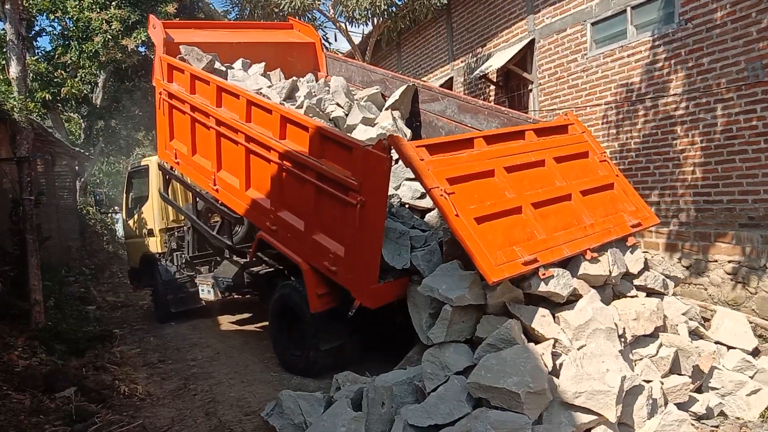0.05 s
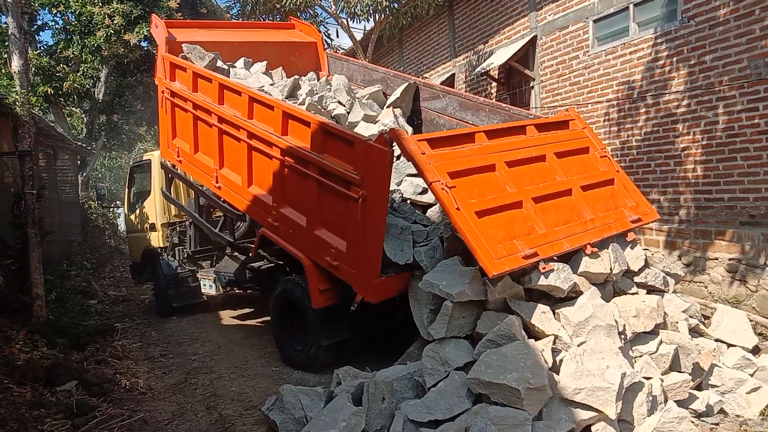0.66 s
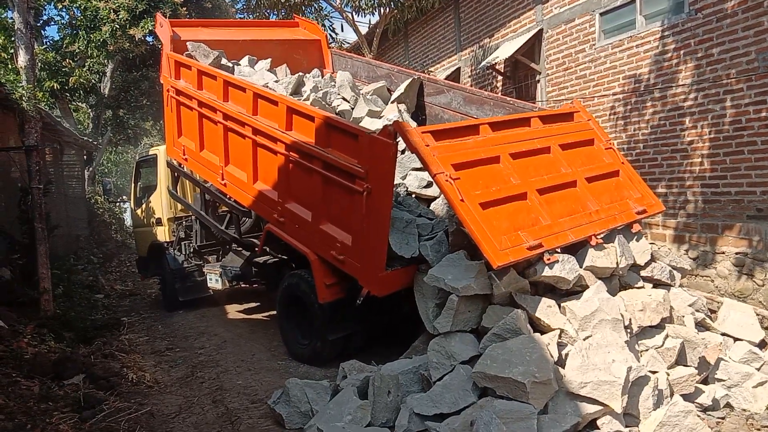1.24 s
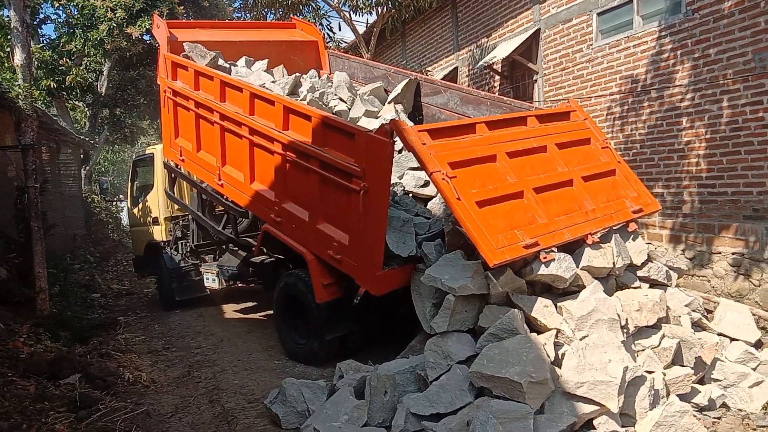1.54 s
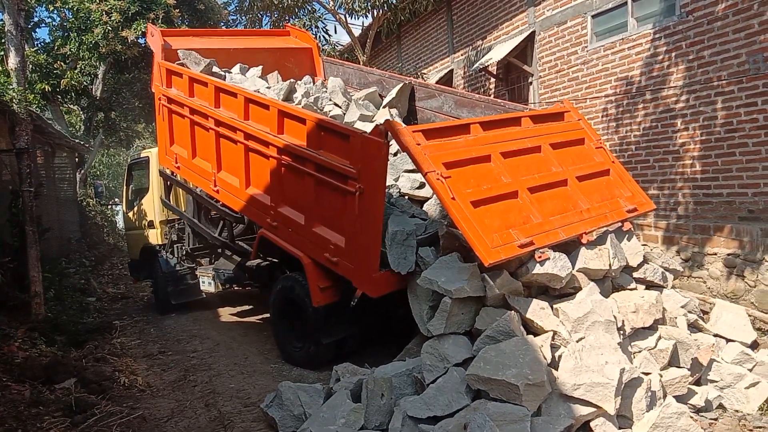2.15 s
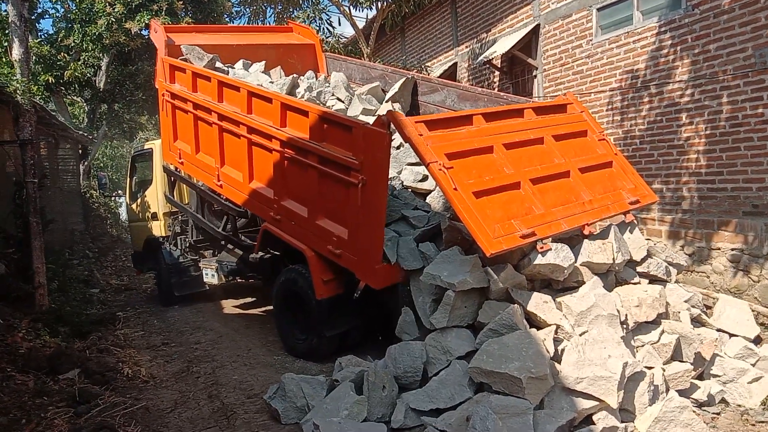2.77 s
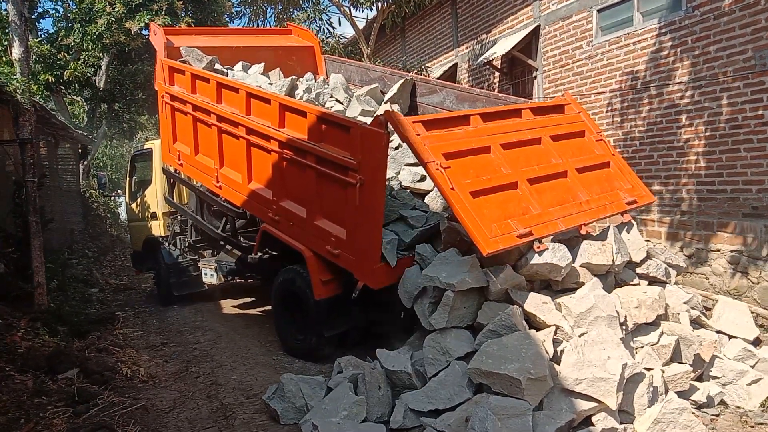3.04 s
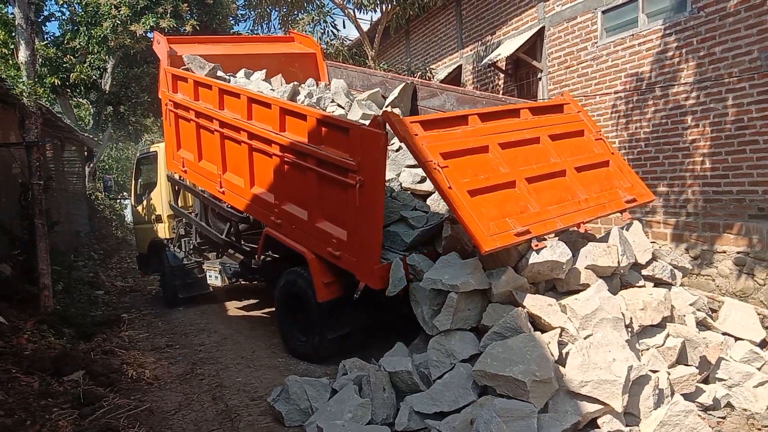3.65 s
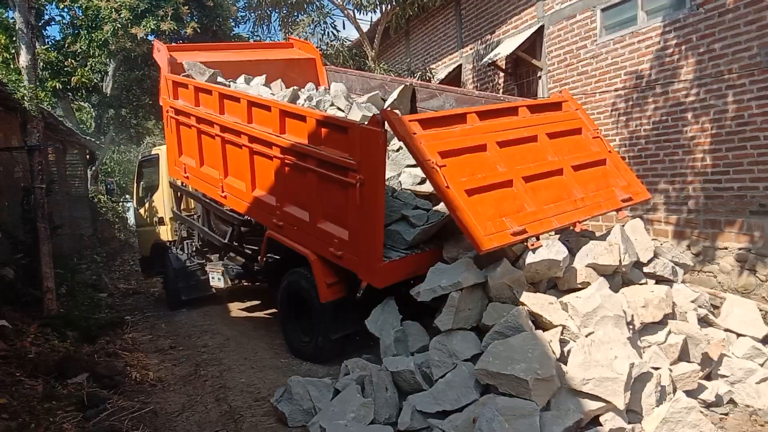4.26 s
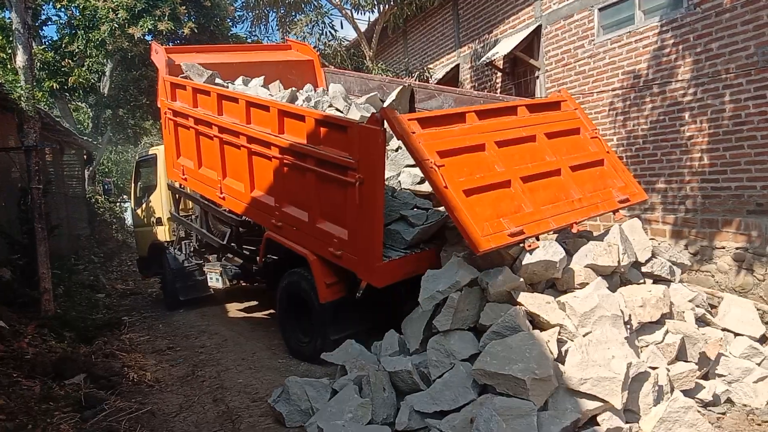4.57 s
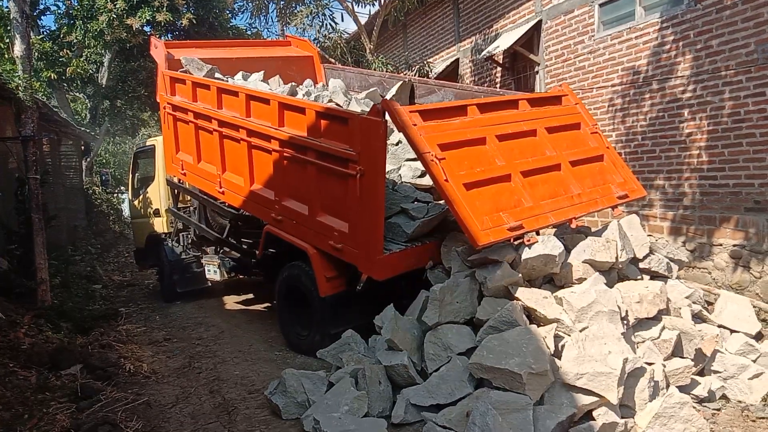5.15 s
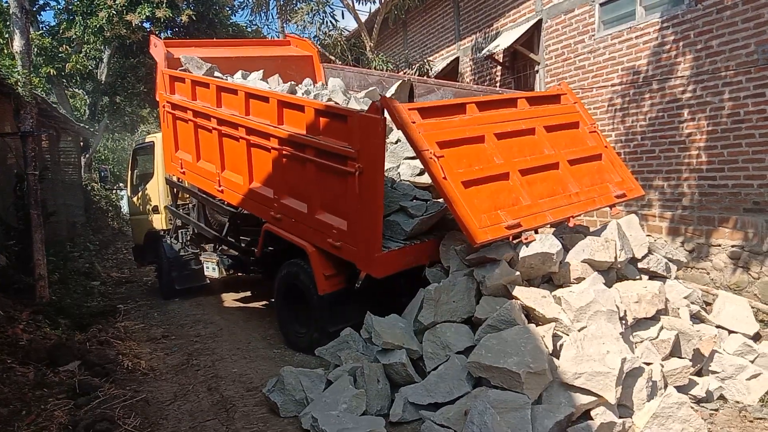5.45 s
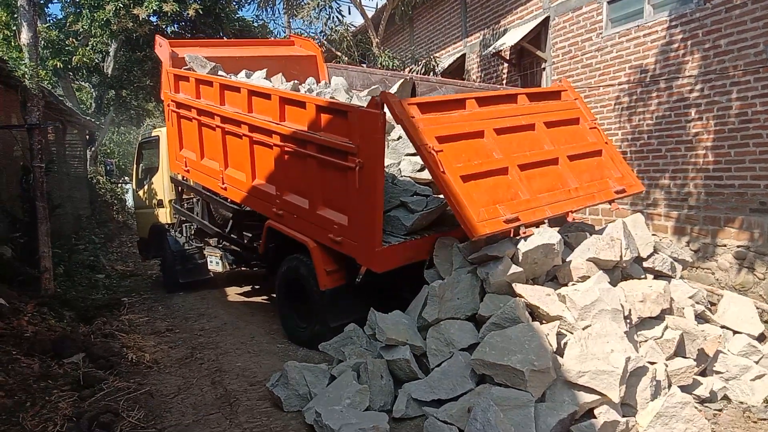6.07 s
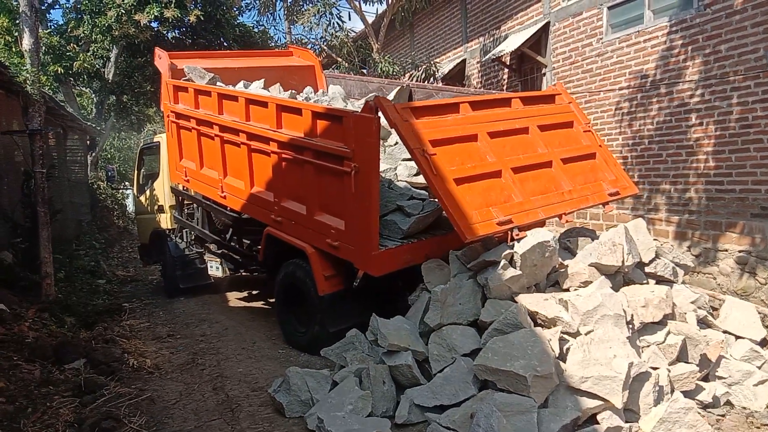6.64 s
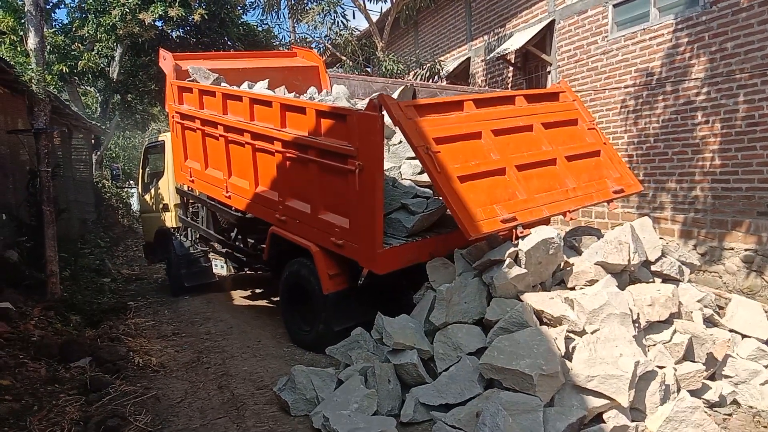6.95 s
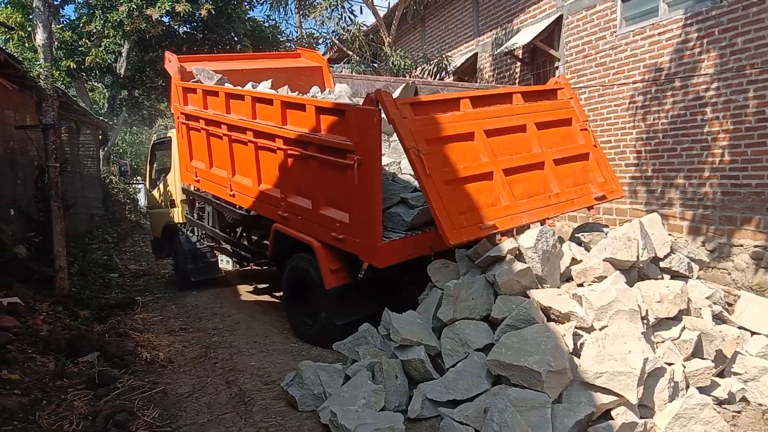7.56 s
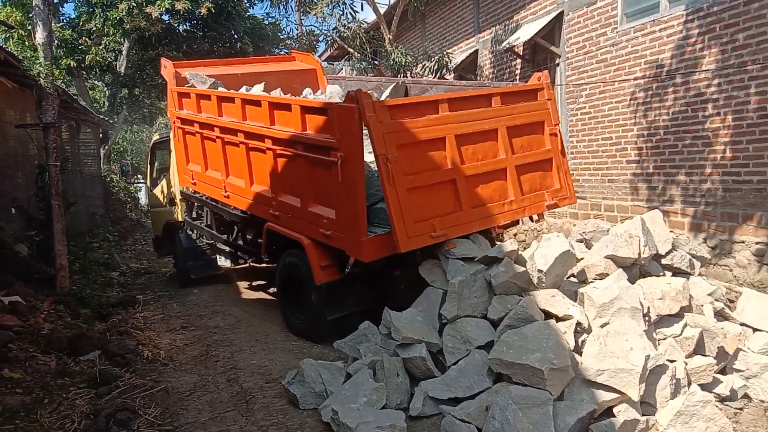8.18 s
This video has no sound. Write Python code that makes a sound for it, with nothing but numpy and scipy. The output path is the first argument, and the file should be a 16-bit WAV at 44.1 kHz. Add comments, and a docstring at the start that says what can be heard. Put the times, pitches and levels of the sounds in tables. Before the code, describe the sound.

A tipper truck's diesel engine idles steadily throughout with a light rattle, heard on a phone microphone in a yard with a short echo. In the first second a few rocks shift and knock onto a pile. After a lull, the load starts slipping at about 2 seconds, grinding over the steel bed with thuds, gritty cracks and bright stone clinks. A heavier tumble runs from about 3.7 to 5 seconds, with hard knocks and ringing chips. The emptying bed booms hollowly at 5.5 seconds, a hinge squeaks briefly just before 6, and more booms lead into a low metal drone as rocks drag across the floor until about 7. From 7.5 seconds a last loud, dense rush of stones rumbles and crashes down, ringing the bed, and eases slightly just after 8 seconds.

```python
"""Tipper truck unloading quarry rock.

A yard with a house and trees, heard on one phone microphone. The diesel idles beside a brick wall
while rocks slide off its raised steel bed onto a pile. They grind over the steel, thud, knock and
clink; the emptying bed booms and drones, a hinge squeaks, and the load ends in a last rush of stones."""
import sys
import numpy as np
from scipy import signal
from scipy.fft import rfft, irfft
from scipy.io import wavfile
from scipy.ndimage import uniform_filter1d

SR = 44100
rng = np.random.default_rng(int(sys.argv[2]) if len(sys.argv) > 2 else 0)


def persist_wave(psi):
    """Save psi, clipped to +-1, as 16-bit WAV."""
    counts = np.round(np.clip(psi, -1, 1) * 32767).astype(np.int16)
    wavfile.write(sys.argv[1], SR, np.atleast_2d(counts).T)


N = 370881
TIME = np.arange(N) / SR
AGE = TIME[:20000]  # time since a contact, for as long as it rings (s)

# modes of the steel bed and tailgate: f/Hz, level/dB, t60/s
BED_MODES = [(89.8, -6, 0.6), (112.7, -11, 0.9), (175, 5, 0.32), (197.6, -4, 0.39), (219, -18, 0.21),
             (250.1, 6, 0.14), (279.5, -13, 0.84), (318.2, 5.5, 0.15), (379.5, -4.5, 0.24), (415, 6, 0.085),
             (740, -19, 0.19), (990, -20.5, 0.076), (970, -24, 0.19), (1264, -16.5, 0.41),
             (2740, -25.5, 0.29)]
# spectrum of a stone chip's tick: f/Hz, level/dB
TICK_SPECTRUM = [(1500, -25.5), (3500, 3.5), (5200, 5.5), (6400, -14), (8000, -27), (9800, -12.5),
                 (12000, -22.5), (15000, -17.5)]


def blows(thud, knock, crack, thud_db=0, knock_db=-8, crack_db=1, own_ring_db=2, own_q=22):
    """Each rock lands, crumbles at the edges and colours the blow with resonances of its own."""
    # the hardest landings, in relative levels: t/s, knock/dB, thud/dB, crack/dB, echo/dB
    landings = [(0.116, -25.5, -36.5, -51, 0), (0.263, -48, -44.5, -69, 3), (0.508, -34.5, -44.5, -58, 1),
                (0.654, -23, -33.5, -51.5, 5), (0.69, -29.5, -33, -61, 0.5), (0.736, -34.5, -41, -63, -11),
                (1.818, -35, -38, -59, 2), (1.941, -35, -33, -50.5, -1), (2.326, -29.5, -30, -51.5, 6),
                (2.409, -34, -34, -52, -5), (2.525, -26, -28, -70, -6), (2.596, -29, -29.5, -50, -2),
                (2.668, -37, -32, -43, 18), (2.841, -31.5, -34, -43.5, -5), (2.934, -33, -50, -40, -16),
                (3.072, -41, -40, -46.5, -8), (3.236, -26.5, -30.5, -52, -3), (3.332, -32, -32.5, -69, 4),
                (3.456, -27, -46.5, -48.5, 7), (3.672, -13, -41, -32.5, 7), (3.684, -15.5, -22, -30, -2.5),
                (3.85, -28, -37, -30.5, -12), (3.903, -21.5, -24, -46, -13),
                (4.023, -22.5, -24.5, -41, -9.5), (4.082, -26.5, -44, -34.5, -9),
                (4.135, -14.5, -20.5, -29.5, 0), (4.26, -33, -34, -41.5, -20),
                (4.322, -21, -19.5, -36.5, 10), (4.399, -18, -17, -40, -10), (4.428, -21, -34, -41, -6),
                (4.498, -18.5, -29, -37.5, 0), (4.585, -33, -28, -53, -10), (4.641, -44, -36, -44.5, 2),
                (4.698, -25.5, -24, -45.5, -8), (4.849, -37, -29.5, -48.5, 17),
                (4.966, -37, -26.5, -53.5, -8), (5.06, -32.5, -32.5, -52, -3), (5.27, -62, -68, -50.5, 1),
                (5.519, -28.5, -22, -42.5, 7), (6.135, -34, -32, -48, -11), (6.204, -14.5, -49, -25.5, 2.5),
                (6.454, -23, -26, -43, -1), (6.548, -27.5, -30, -38, -3.5),
                (6.631, -27.5, -51, -47.5, -7.5), (6.729, -39, -29, -73, -13.5),
                (6.853, -33.5, -33.5, -49.5, -3), (6.918, -32, -35.5, -43, 3),
                (6.958, -28.5, -24, -38.5, -8.5), (7.119, -23.5, -28.5, -47.5, 0.5),
                (7.276, -26.5, -41.5, -73, -13), (7.459, -24, -29.5, -47, 5.5), (7.524, -22, -22, -34, -4),
                (7.534, -16, -17.5, -34.5, -6.5), (7.556, -24.5, -25.5, -46.5, -2),
                (7.604, -28.5, -25, -51, -17), (7.654, -27.5, -22, -37, -9),
                (7.697, -14.5, -22.5, -30.5, -7), (7.723, -25, -20.5, -34, -3),
                (7.754, -21, -17, -36, -3.5), (7.838, -21.5, -27, -33.5, 2), (7.89, -20, -19, -32, -2),
                (7.983, -23, -18.5, -35, -3.5), (8.135, -28, -27.5, -48.5, 6), (8.277, -55, -46, -46, -6)]
    out = np.zeros(N)
    for s, knock_level, thud_level, crack_level, echo_db in landings:
        hit = through(crumble(rate=1800, crush_s=0.0084, chatter_db=-4.5), yard(echo_db))
        pitches = np.geomspace(750, 5400, num=11) * 2 ** rng.uniform(-.13, .13, size=11)
        hit = hit + undb(own_ring_db) * sum(stone(hit, hz, own_q) for hz in pitches)
        levels = thud_level + thud_db, knock_level + knock_db, crack_level + crack_db
        for body, db in zip((thud, knock, crack), levels):
            add(out, s, undb(db) * strike(through(hit, body)))
    return out


def slipping(rise_s=0.075, settle_t60=0.75, sag_db_per_s=5.5):
    """Rumble, grind and grit envelopes: each slip gathers speed, slows a little, then settles."""
    # the load's fits and starts, in relative levels: t/s, length/s, rumble/dB, grind/dB, grit/dB
    slips = [(-0.05, 0.026, -25, -36.5, -52.5), (0.582, 0.048, -34, -40, -57.5),
             (1.506, 0.57, -42, -54, -65), (2.157, 0.25, -40.5, -42.5, -54.5), (2.447, 0.29, -35, -39, -49),
             (2.843, 0.74, -37.5, -45, -53.5), (3.658, 1, -28.5, -36, -43.5), (4.172, 0.4, -33, -31, -52),
             (4.708, 0.3, -39, -45, -57), (5.34, 0.41, -26, -43, -79), (5.741, 0.76, -38.5, -47.5, -57),
             (6.182, 0.071, -21.5, -27.5, -62), (6.41, 0.54, -43, -43, -63), (7.13, 0.6, -34.5, -41.5, -61),
             (7.494, 0.31, -24, -37, -41.5), (7.684, 0.23, -23, -26, -39.5), (7.942, 0.17, -25, -33, -41),
             (8.233, 0.23, -28, -38, -58.5)]
    power = 0  # overlapping slips add in power
    for s, length_s, *levels_db in slips:
        motion = swell(s, length_s, rise_s, settle_t60, sag_db_per_s)
        power = power + np.outer(undb(levels_db), motion) ** 2
    return np.sqrt(power)


def slide(thud, knock, crack, rumble, grind, grit, slide_db=-1, rubble_db=-6):
    """Boulders rumble, rocks grind and small stones rasp, over a dense patter of rubble."""
    rubble = patter(rate=280, soften_db=1)
    boulders = scrapes(105.7, 458, q=5, count=400)
    rocks = scrapes(482, 1500, q=7.3, count=500)
    pebbles = scrapes(1620, 5600, q=10, count=420)
    space, out = yard(echo_db=-11), 0
    for scraping, body, drive in (boulders, thud, rumble), (rocks, knock, grind), (pebbles, crack, grit):
        sound = unit(through(scraping, body)) + undb(rubble_db) * unit(through(rubble, body))
        out = out + drive * unit(through(sound, space))
    return undb(slide_db) * out


def scrapes(low_hz, high_hz, q, count, scrape_t60=0.06, spread_db=13):
    """Stones take turns to slip; each short scrape rings at the pitch of its stone."""
    out, t = np.zeros(N), AGE[:len(AGE) // 8]
    for k, (late, pitch, hardness) in enumerate(rng.random((count, 3))):
        rub = rng.standard_normal(len(t)) ** 3 * fade(t, scrape_t60)  # cubed noise is spiky
        hz = low_hz * (high_hz / low_hz) ** pitch
        add(out, (k + late) / count * N / SR, undb(spread_db * hardness) * unit(stone(rub, hz, q)))
    return unit(out)


def patter(rate, soften_db):
    """Rubble makes random contacts, `rate` a second, some a little softer than the rest."""
    force = undb(-soften_db * np.minimum(rng.exponential(size=N), 4))
    return (rng.random(N) < rate / SR) * force * rng.choice([-1, 1], N)


def booms(focus_db_per_octave=16, contact_s=0.0039, lowest_hz=85):
    """Heavy blows ring the bed; each spot favours the modes near its own pitch."""
    # heavy rocks dropping on the steel floor: t/s, level/dB, favoured f/Hz
    drops = [(0.655, -28, 347), (1.82, -37.5, 118), (1.975, -35, 126), (2.548, -27, 417), (2.99, -43, 117),
             (3.331, -27.5, 254), (4.2, -24.5, 260), (4.401, -20, 410), (5.403, -34, 353),
             (5.517, -16.5, 254), (6.056, -18, 230), (6.102, -14.5, 175), (6.568, -30.5, 170),
             (6.961, -36, 335), (7.534, -18, 208), (7.714, -16, 306), (7.731, -30, 96), (7.984, -25.5, 170)]
    out = np.zeros(N)
    radiation = signal.butter(3, lowest_hz, "highpass", fs=SR, output="sos")
    onset = (1 - np.exp(-AGE / contact_s)) ** 2
    for s, db, spot_hz in drops:
        modes = np.array(BED_MODES, float)
        modes[:, 1] -= focus_db_per_octave * np.abs(np.log2(modes[:, 0] / spot_hz))
        plate = signal.sosfilt(radiation, ring(modes) * onset)
        add(out, s, undb(db) * strike(through(plate, yard(echo_db=-15))))
    return out


def clinks(t60=0.013, q=2, twin_ratio=1.06, low_ratio=0.53):
    """A stone chatters and rings briefly in a close pair of modes over a weaker low one; chips fly."""
    # struck stones: t/s, f/Hz, ring/dB, chatter/dB, chips/dB
    struck_stones = [(0.661, 1660, -42, -2, -85), (1.614, 3000, -57, 1, -70), (2.33, 1690, -41, -6, -74),
                     (2.409, 2650, -46, 0, -59), (2.424, 4600, -73, -3, -71), (2.487, 2800, -51, -7, -54),
                     (2.487, 1120, -39.5, -6, -60), (2.594, 2500, -36, 16, -42.5),
                     (2.671, 2750, -42, 9, -45.5), (2.843, 3710, -42, -2, -54.5),
                     (2.936, 5430, -52, 0, -47.5), (3.14, 1230, -28.5, 0, -51),
                     (3.236, 2810, -35.5, -4, -45), (3.507, 3580, -46.5, -11, -56),
                     (3.85, 1145, -14.5, -38, -43.5), (3.856, 1213, -18.5, -14.5, -58),
                     (4.14, 2810, -29, -6, -46), (4.401, 744, -22, -23, -48.5), (4.646, 4800, -58, 2, -59),
                     (4.695, 840, -26, -13, -65), (4.969, 2850, -49, 6, -58.5), (5.001, 863, -30, -15, -56),
                     (5.058, 2600, -47, -1, -55.5), (5.271, 3040, -43.5, -6, -54),
                     (5.271, 5000, -52, -15, -62), (5.517, 3260, -51.5, 2.5, -64.5),
                     (5.66, 9300, -77, -5, -74), (5.767, 9350, -74, -12, -75),
                     (6.204, 3050, -40, -15, -47.5), (6.208, 4860, -41.5, -8, -57),
                     (6.547, 3100, -41, -1, -47), (6.729, 750, -39, -4, -74), (6.967, 2800, -48, 6, -51.5),
                     (7.122, 1096, -37, -4, -52), (7.699, 930, -18.5, -8.5, -52),
                     (7.725, 3220, -34.5, 0, -50), (7.754, 3370, -41, 0, -51),
                     (7.839, 3790, -38.5, -5.5, -43), (7.891, 910, -23, -10, -55),
                     (7.987, 3040, -45, -8, -48.5)]
    out, tick = np.zeros(N), colour(TICK_SPECTRUM)
    for s, hz, db, chatter_db, chips_db in struck_stones:
        tone = ring([(hz, 0, t60), (hz * twin_ratio, -6, t60), (hz * low_ratio, -12, t60)])
        tone = stone(stone(tone, hz, q), hz, q)  # a blunt contact takes a few cycles to build up
        tone = through(tone, crumble(rate=970, crush_s=0.0053, chatter_db=chatter_db))
        add(out, s, undb(db) * strike(through(tone, yard(echo_db=-10, far_db=-34))))
        add(out, s, undb(chips_db) * strike(through(chips(tick), yard(echo_db=-18, far_db=-27.5))))
    return out


def slabs(t60=0.14, mode_scatter=0.03):
    """Each flat slab rings on in a few modes, spaced a little differently from the next slab's."""
    # struck slabs: t/s, f/Hz, level/dB
    struck_slabs = [(2.596, 2970, -48), (2.669, 3020, -45), (2.842, 3810, -48.5), (3.142, 3660, -48.5),
                    (3.237, 3320, -53), (3.507, 3554, -50.5), (4.14, 2820, -35)]
    # modes of a slab: multiple of its pitch, level/dB
    slab_modes = [(0.581, -6), (0.75, -2.5), (1, 1.5), (1.22, -5.5), (1.461, -14)]
    out = np.zeros(N)
    for s, hz, db in struck_slabs:
        skews = 1 + mode_scatter * rng.standard_normal(len(slab_modes))
        modes = [(hz * ratio * (1 if ratio == 1 else skew), mode_db, t60)
                 for (ratio, mode_db), skew in zip(slab_modes, skews)]
        tone = ring(modes) * (1 - fade(AGE, 0.008))
        tone = through(tone, crumble(rate=1200, crush_s=0.012, chatter_db=-3))
        add(out, s, undb(db) * strike(through(tone, yard(echo_db=-14))))
    return out


def gravel(grit, gravel_db=-19.5, count=150, spread_db=9):
    """Loose splinters skip down with the small stones, each with its own pitches."""
    out, tick = np.zeros(N), colour(TICK_SPECTRUM)
    for when, hardness in rng.random((count, 2)):
        add(out, when * N / SR, undb(spread_db * hardness) * strike(chips(tick)))
    return grit * undb(gravel_db) * unit(through(out, yard(echo_db=-11.5)))


def chips(tick, q=42, body_db=-14, crunch_s=0.02, rise_s=0.003, rate=2600):
    """An edge crunches for a moment and stops; its splinters each ping at their own pitch."""
    pitches = np.geomspace(3800, 13500, num=8) * 2 ** rng.uniform(-.12, .12, size=8)
    t = AGE[:4096]
    crunch = (1 - np.exp(-t / rise_s)) * np.exp(-(t / crunch_s) ** 2)
    bursts = [crunch * (rng.random(len(t)) < rate / SR) * rng.standard_normal(len(t)) for _ in pitches]
    pings = sum(stone(burst, hz, q) for burst, hz in zip(bursts, pitches))
    return signal.fftconvolve(pings + undb(body_db) * bursts[0], tick)


def crumble(rate, crush_s, chatter_db):
    """One contact, then a quick run of further ones, `rate` a second, as the edges break; chatter_db sets how
    strong they are beside the first, weaker or stronger."""
    chance, force = rng.random(len(AGE)), rng.standard_normal(len(AGE))
    contacts = (chance < rate / SR) * force * np.exp(-AGE / crush_s) * undb(chatter_db)
    contacts[0] = 1
    return contacts


def stone(x, hz, q):
    """One damped resonance of a stone."""
    return signal.lfilter(*signal.iirpeak(min(hz, SR / 3), q, SR), x)


def bed_drone(hz=110.7, db=-29):
    """The bed's floor drones as the load drags over it."""
    drag = swell(start_s=6.08, length_s=0.93, rise_s=0.04, release_t60=0.49, sag_db_per_s=15.5)
    return undb(db) * drag * friction_tone(hz, waver=0.016, waver_hz=23, overtone_db=-20)


def squeaks(sag_hz_per_s=3000, top_hz=4000):
    """Steel squeaks under sliding stones and at the hinge, falling in pitch as the contact slows."""
    # rubbing contacts: t/s, length/s, starting f/Hz, level/dB, rasp as a share of the pitch
    rubs = [(4.079, 0.015, 3450, -36, 0.074), (5.886, 0.065, 1762, -41.5, 0.037),
            (7.378, 0.07, 3360, -56, 0.038)]
    out = 0
    for s, length_s, start_hz, db, rasp in rubs:
        rub = swell(s, length_s, rise_s=length_s / 5, release_t60=0.054)
        hz = start_hz - sag_hz_per_s * np.clip(TIME - s, 0, length_s)
        out = out + undb(db) * rub * friction_tone(hz, waver=rasp, waver_hz=513, overtone_db=-14)
    dull = signal.butter(6, top_hz, fs=SR, output="sos")
    space = yard(echo_db=-4.5)
    return through(signal.sosfilt(dull, out), space / np.linalg.norm(space))


def friction_tone(hz, waver, waver_hz, overtone_db):
    """Steel rubbed into a wavering tone with its octave."""
    smooth = signal.butter(2, waver_hz, fs=SR, output="sos")
    wander = unit(signal.sosfilt(smooth, rng.standard_normal(N)))
    phase = 2 * np.pi * np.cumsum(hz * (1 + waver * wander)) / SR
    return unit(np.sin(phase) + undb(overtone_db) * np.sin(2 * phase))


def engine(idle_db=-51.5, rattle_db=-61.5, firing_hz=19.84, jitter_s=0.004, whirr=0.12):
    """A four-cylinder diesel idles: uneven firings shake the block and rattle loose fittings."""
    # spectrum of the idle: f/Hz, level/dB
    idle_spectrum = [(25, -19.5), (40, -6.5), (52, -10.5), (92, -3.5), (140, -3.5), (330, -6), (600, -11.5),
                     (900, -7.5), (1050, -15.5), (1300, -11.5), (1800, -20.5), (3100, -21.5), (4300, -35.5),
                     (5200, -33.5), (6300, -49.5), (8000, -66)]
    # engine block and exhaust resonances: f/Hz, level/dB, t60/s
    block_modes = [(87, -1.5, 0.32), (170, 1.5, 0.19), (260, -6, .2), (334, 4.5, 0.2), (1194, 11.5, 0.083)]
    # modes of the loose fittings: f/Hz, level/dB, t60/s
    fitting_modes = [(876, -1.5, 0.13), (1219, -3, 0.15), (2203, -9, 0.12), (3840, -17, 0.1)]
    cylinders_db, cylinder_colour_db = (2, -2, -0.44, -2.1), 3
    firing_scatter_db, rattle_scatter_db = 1.3, 8
    knock_t60, rise_s = 0.15, 0.01
    force, looseness, late = rng.standard_normal(size=(256, 3)).T
    firings = (TIME - 0.043) * firing_hz  # running count, from 43 ms in
    firings -= firing_hz * jitter_s * np.interp(firings, np.arange(len(late)), late)
    since_s, stroke = firings % 1 / firing_hz, np.floor(firings).astype(int)
    pulse = fade(since_s, knock_t60) * (1 - np.exp(-since_s / rise_s))
    knocks = undb(firing_scatter_db * force)[stroke] * pulse
    idle = through(whirr * rng.standard_normal(N), resonant(idle_spectrum, block_modes, ring_db=-52.5))
    for k, db in enumerate(cylinders_db):
        modes = np.array(block_modes, float)  # each cylinder rings the block in its own way
        modes[:, 1] += cylinder_colour_db * rng.standard_normal(len(modes))
        combustion = (stroke % len(cylinders_db) == k) * knocks * rng.standard_normal(N)
        idle += undb(db) * through(combustion, resonant(idle_spectrum, modes, ring_db=-52))
    shake = knocks * undb(rattle_scatter_db * np.minimum(looseness, 1))[stroke]
    rattle = through(shake * rng.standard_normal(N), ring(fitting_modes) * (1 - fade(AGE, 0.01)))
    return undb(idle_db) * unit(idle) + undb(rattle_db) * unit(rattle)


def yard(echo_db, near_t60=0.26, far_t60=0.64, far_db=-11):
    """Direct sound, near scatter between rocks and bed walls, then the far tail off house and trees."""
    decay = fade(AGE, near_t60) + undb(far_db) * fade(AGE, far_t60)
    tail = rng.standard_normal(len(AGE)) * decay * (1 - fade(AGE, 0.006))
    response = tail * undb(echo_db + 10) / np.linalg.norm(tail)  # at -10 it equals the direct sound
    response[0] += 1
    return response


def undb(db):
    """Decibels to gain."""
    return 10 ** (np.asarray(db) / 20)


def unit(x):
    """Scale to rms 1."""
    return x / np.sqrt(np.mean(x ** 2))


def fade(t, t60):
    """Exponential decay, 60 dB down at t60."""
    return np.exp(-np.log(1000) * t / t60)


def swell(start_s, length_s, rise_s, release_t60, sag_db_per_s=0):
    """Envelope of a sliding contact: it builds up, sags and dies away."""
    age = np.maximum(TIME - start_s, 0)
    held = np.minimum(age / rise_s, 1) * undb(-sag_db_per_s * age)
    return held * fade(np.maximum(age - length_s, 0), release_t60)


def strike(x):
    """Let a hit die away fully and scale it to rms 1 over its loudest 20 ms."""
    x = x * np.minimum(np.linspace(2, 0, num=len(x)), 1)
    return x / np.sqrt(uniform_filter1d(x ** 2, size=SR // 50, mode="constant").max())


def through(x, response):
    """Pass a sound through an impulse response."""
    return signal.fftconvolve(x, response)[:len(x)]


def add(out, s, x):
    """Mix x in at time s."""
    i = max(int(s * SR), 0)
    out[i:i + len(x)] += x[:max(N - i, 0)]


def colour(points, size=4096):
    """Minimum-phase response with the given spectrum: f/Hz, level/dB."""
    hz, db = np.transpose(points)
    f = np.maximum(np.arange(size // 2 + 1) * SR / size, 1)
    gain = undb(np.interp(np.log(f), np.log(hz), db))
    cepstrum = irfft(np.log(gain))
    cepstrum[1:size // 2] *= 2
    cepstrum[size // 2 + 1:] = 0
    return irfft(np.exp(rfft(cepstrum)))


def ring(modes):
    """Decaying modes struck together."""
    return sum(undb(db) * fade(AGE, t60) * np.cos(2 * np.pi * hz * AGE) for hz, db, t60 in modes)


def resonant(points, modes, ring_db):
    """A coloured click that also sets the modes ringing."""
    response = undb(ring_db) * ring(modes)
    response[0] += 1
    return through(response, colour(points))


def scene():
    """The yard in mono: blows and sliding rock share the ring of the steel bed, the engine beneath."""
    # a rock's low thud: f/Hz, level/dB
    thud_spectrum = [(25, -38), (55, -19), (85, -6.5), (130, -6.5), (190, -1.5), (250, 0), (340, 0.5),
                     (450, -2.5), (620, -16.5), (1200, -69), (3000, -105)]
    # its midrange knock: f/Hz, level/dB
    knock_spectrum = [(100, -34.5), (330, 1.5), (520, 6), (900, 11), (1100, 4.5), (1320, 9.5), (1550, -34),
                      (2200, -30), (4000, -42), (8000, -105)]
    # its bright crack: f/Hz, level/dB
    crack_spectrum = [(400, -51.5), (1200, 3), (1700, 5), (2250, 1.5), (2900, 3), (3550, -3.5),
                      (4150, -18.5), (4900, -12), (5700, -30.5), (6500, -32.5), (8000, -49), (10000, -40.5),
                      (15000, -55)]
    bodies = (resonant(thud_spectrum, BED_MODES, ring_db=-66.5),
              resonant(knock_spectrum, BED_MODES, ring_db=-47.5),
              resonant(crack_spectrum, BED_MODES, ring_db=-33.5))
    rumble, grind, grit = slipping()
    rocks = blows(*bodies) + slide(*bodies, rumble, grind, grit) + gravel(grit) + clinks() + slabs()
    return (rocks + booms() + bed_drone() + squeaks() + engine())[None]


def record(dry):
    """The phone microphone adds a faint hiss and cuts the top."""
    hiss_db, top_hz = -87, 15400
    hiss = undb(hiss_db) * rng.standard_normal(dry.shape)
    return signal.sosfilt(signal.ellip(8, .2, 70, top_hz, fs=SR, output="sos"), dry + hiss)


dry = scene()
out = record(dry)
persist_wave(out)
```